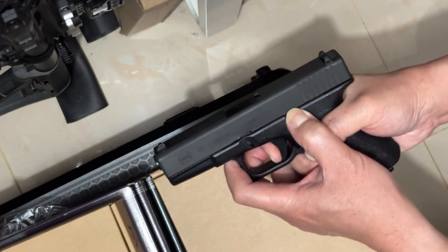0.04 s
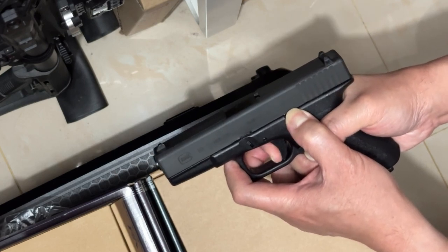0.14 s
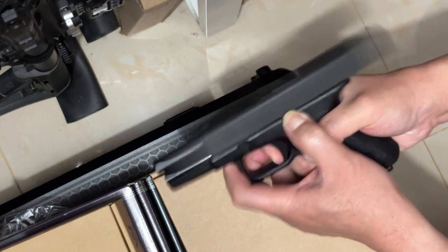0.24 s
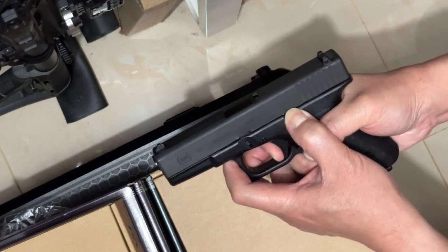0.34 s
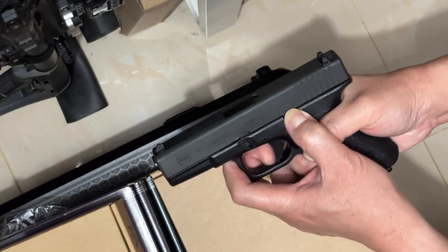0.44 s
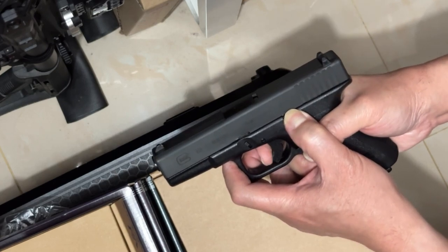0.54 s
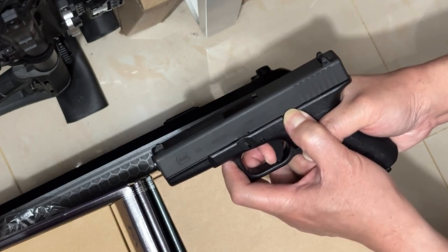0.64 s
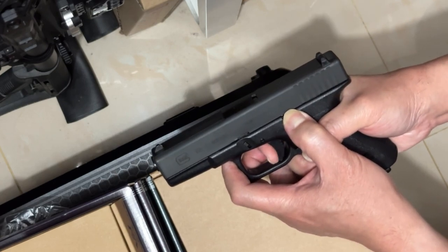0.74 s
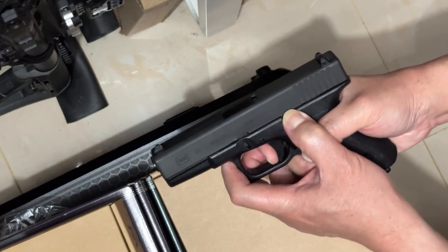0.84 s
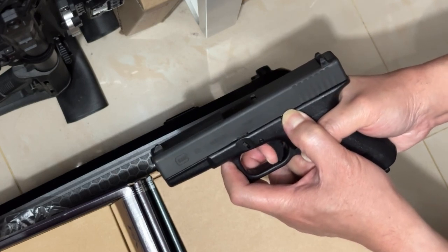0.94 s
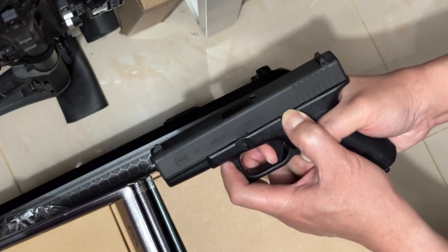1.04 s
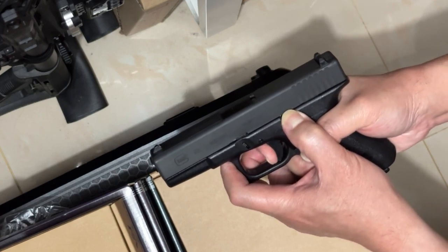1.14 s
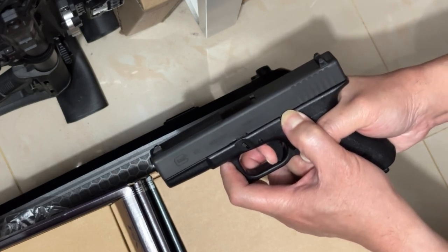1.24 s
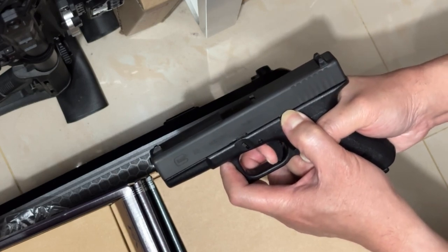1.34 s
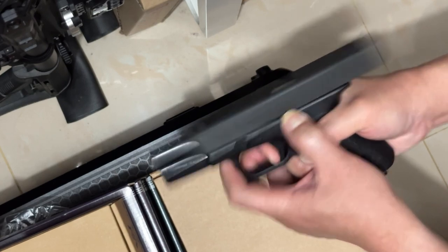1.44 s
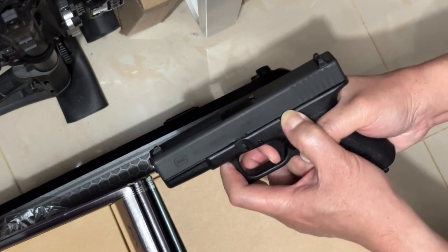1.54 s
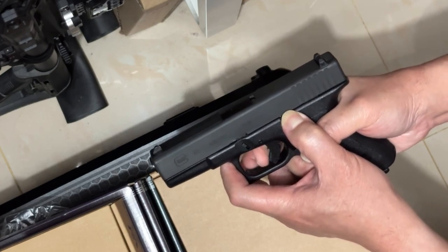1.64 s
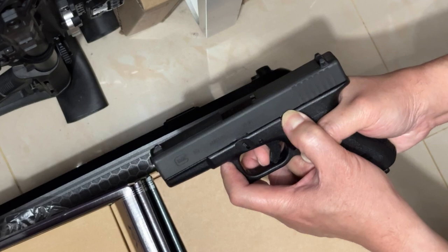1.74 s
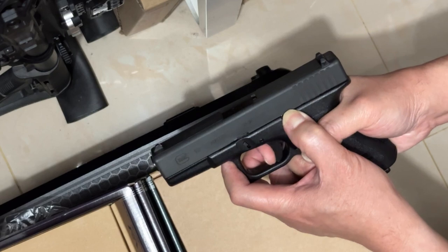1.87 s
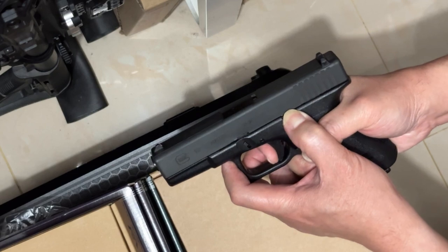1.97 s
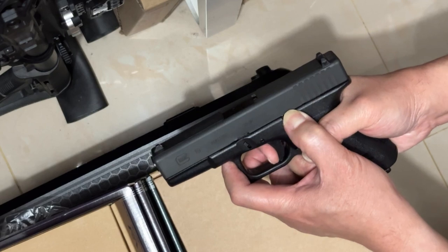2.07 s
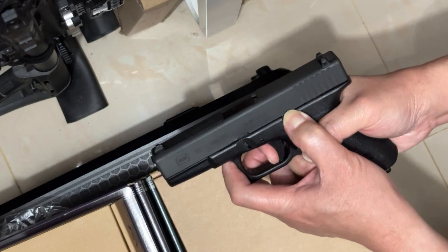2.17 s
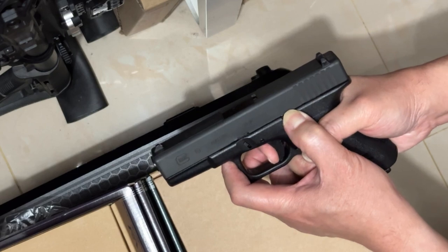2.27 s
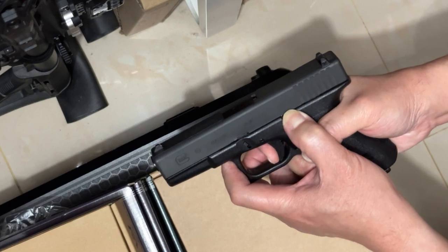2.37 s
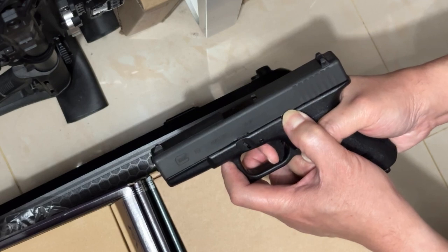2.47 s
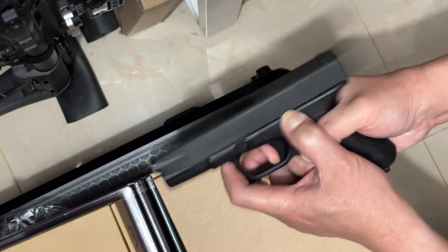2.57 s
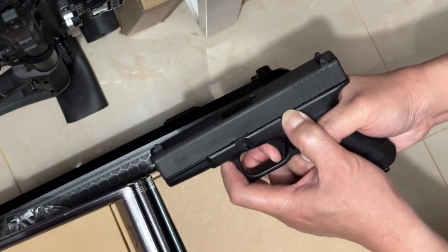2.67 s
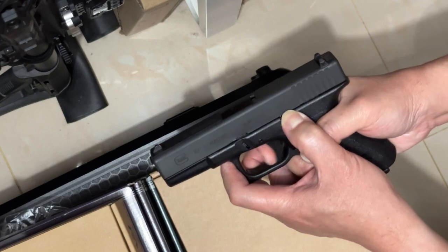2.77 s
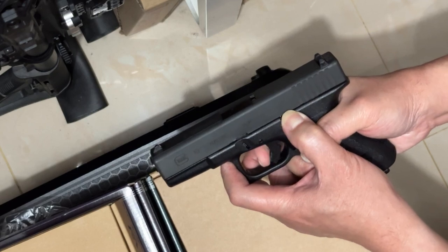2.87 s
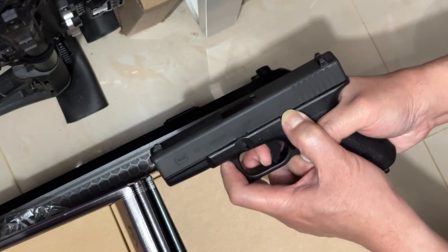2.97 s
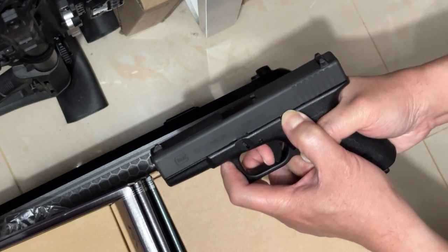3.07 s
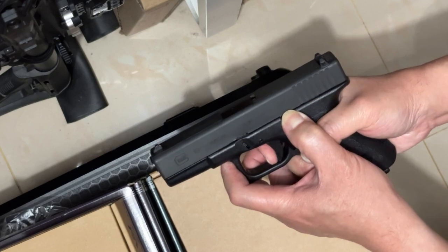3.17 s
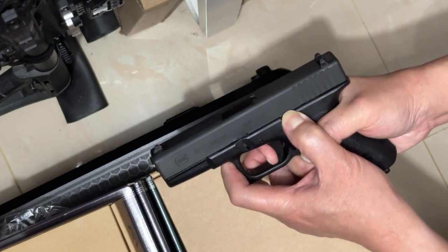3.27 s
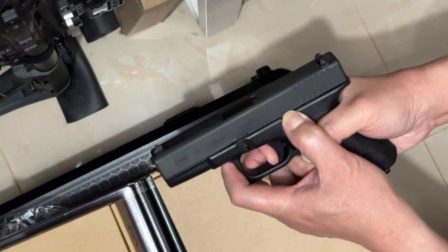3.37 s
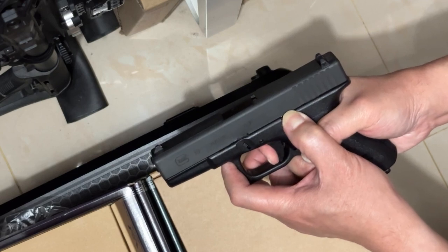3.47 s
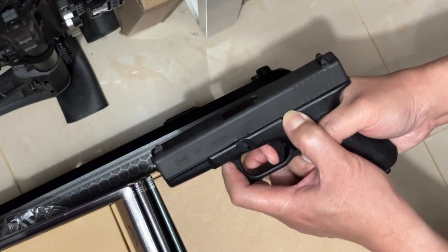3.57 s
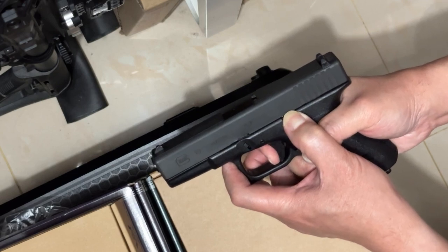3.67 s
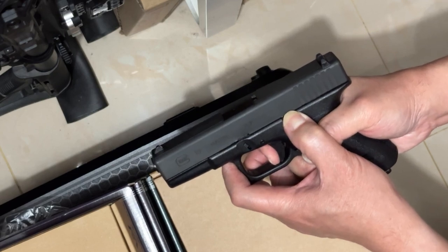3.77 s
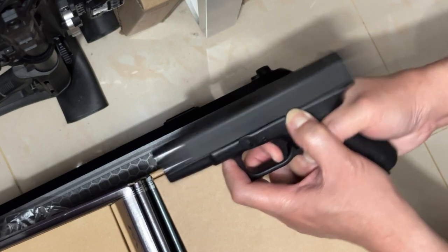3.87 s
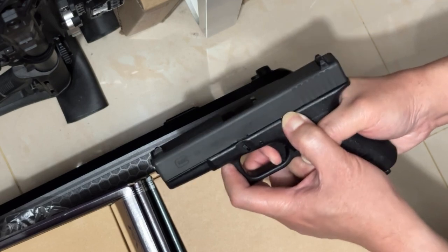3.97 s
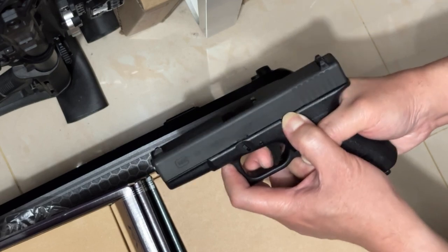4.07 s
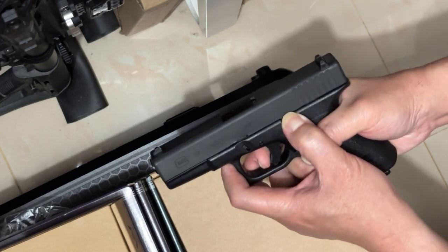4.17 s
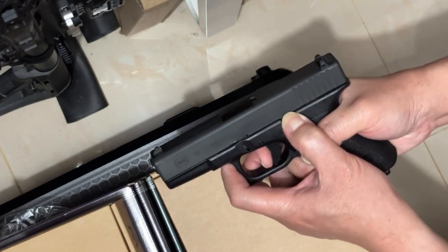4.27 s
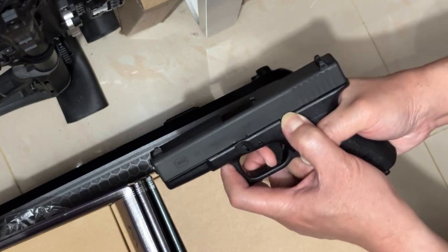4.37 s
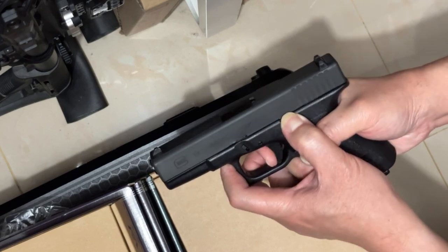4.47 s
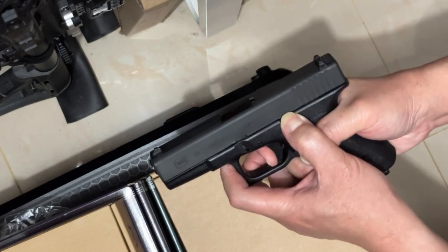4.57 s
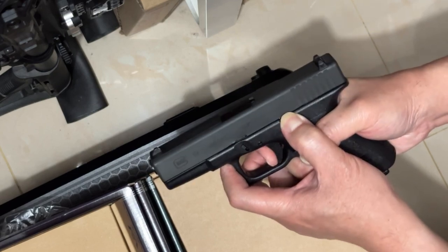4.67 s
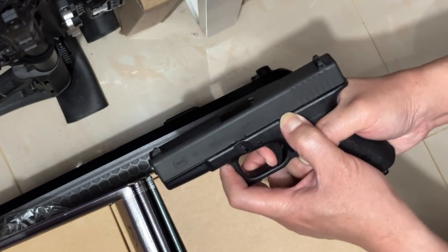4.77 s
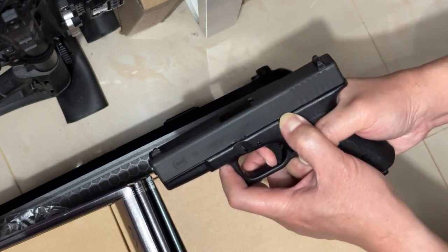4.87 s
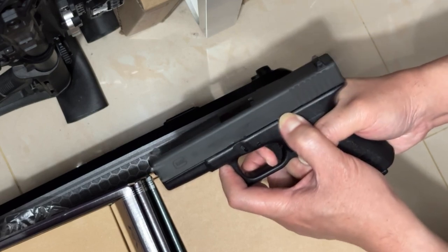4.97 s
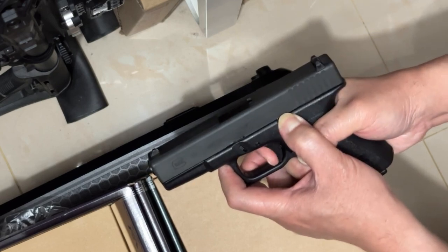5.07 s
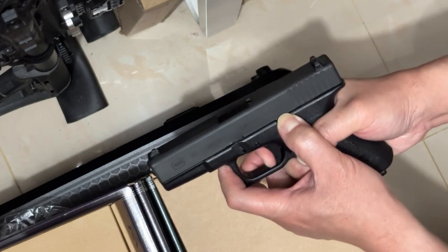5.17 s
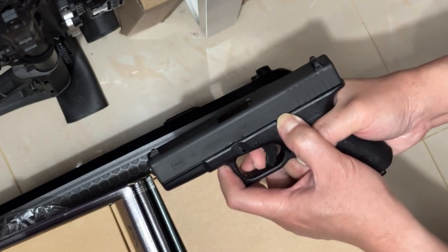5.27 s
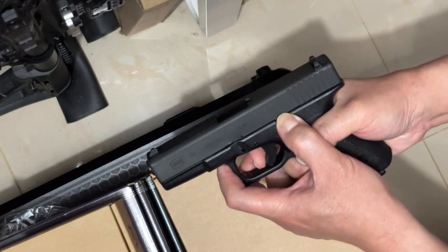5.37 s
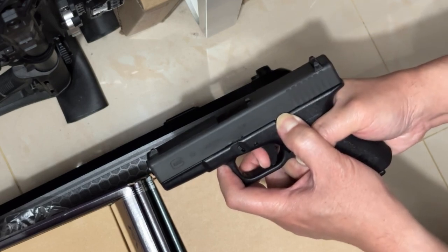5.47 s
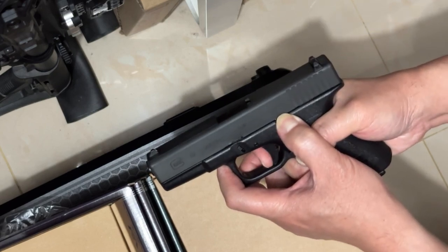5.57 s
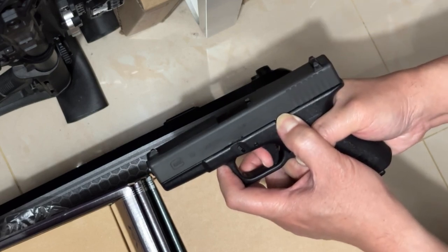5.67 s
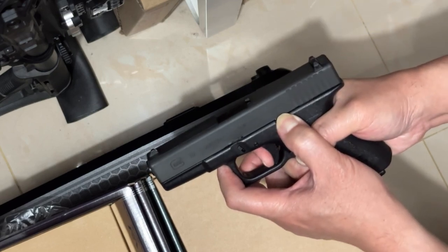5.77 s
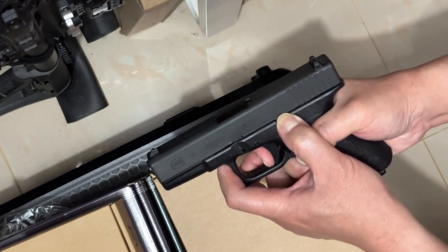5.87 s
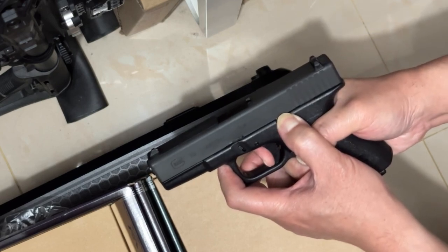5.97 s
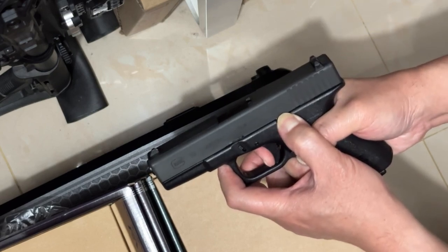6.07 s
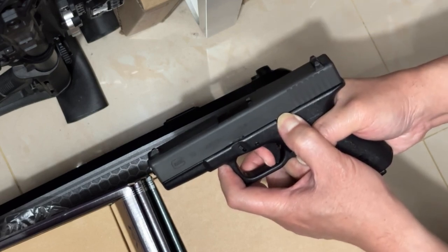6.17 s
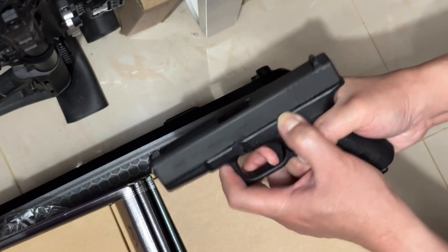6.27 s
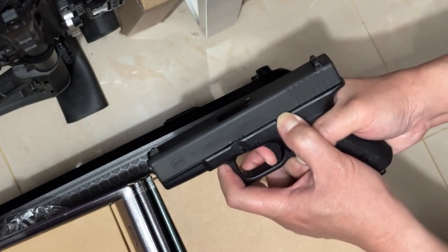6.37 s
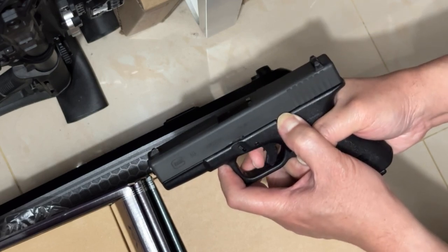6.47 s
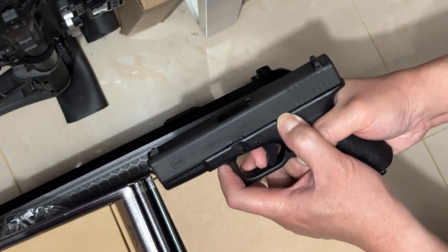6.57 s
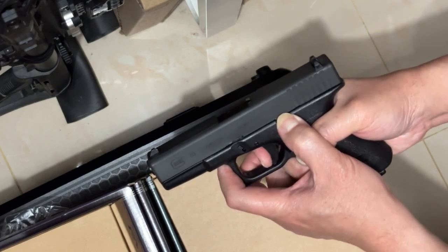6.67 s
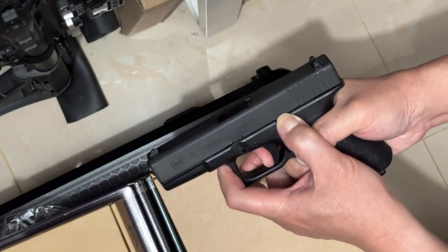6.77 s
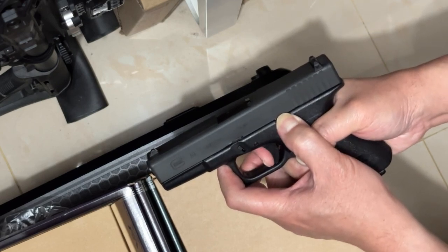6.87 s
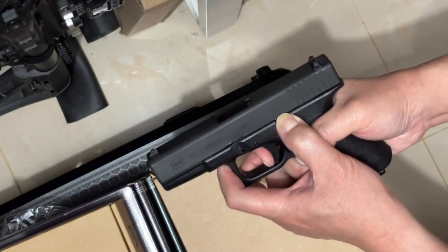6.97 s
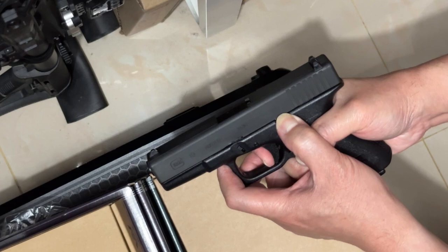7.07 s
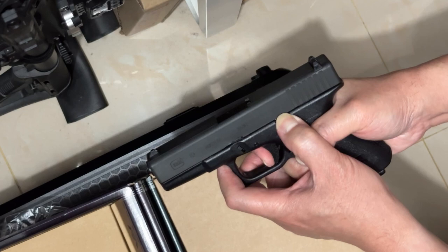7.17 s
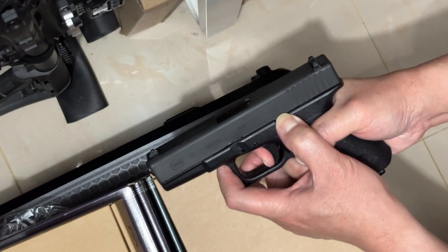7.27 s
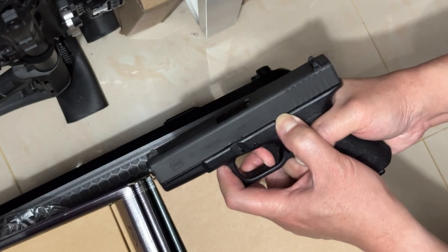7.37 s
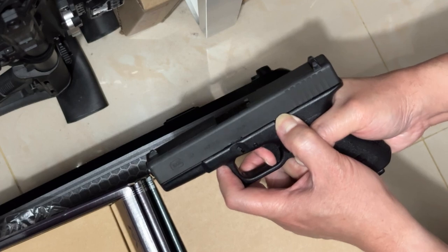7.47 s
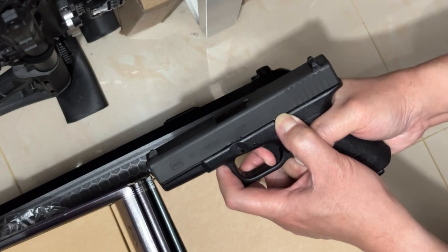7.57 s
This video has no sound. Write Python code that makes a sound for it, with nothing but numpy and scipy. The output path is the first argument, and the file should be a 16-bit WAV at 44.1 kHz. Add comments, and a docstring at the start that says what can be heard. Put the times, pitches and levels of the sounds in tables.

```python
"""A blowback gas pistol, fired empty seven times in a small tiled room, close to a phone's stereo mics.
On each shot the hammer swings onto the valve, gas bursts out and rings the steel, and the slide
rattles back and slams shut. Between shots the trigger is let go, the sear resets with a double
click, and the trigger is taken up again. The tiles answer with hard reflections and a short tail;
under it all lies a low room tone."""
import sys
import numpy as np
from scipy import signal
from scipy.fft import rfft, irfft
from scipy.io import wavfile
from scipy.ndimage import uniform_filter1d

SR = 44100
rng = np.random.default_rng(int(sys.argv[2]) if len(sys.argv) > 2 else 0)


def digitize_waveform(pressure):
    """Quantize a signal to 16-bit integers and store it at the path in sys.argv[1].

    Rows of a 2-D input are taken as channels; values are limited to [-1, 1].
    """
    field = np.atleast_2d(pressure).T
    bounded = np.clip(field, -1, 1)
    quanta = np.round(bounded * 32767).astype(np.int16)
    wavfile.write(sys.argv[1], SR, quanta)


N = 336042
RING_SIZE = 16384  # samples in one ring, burst or room tail
AGE = np.arange(RING_SIZE) / SR

# the shots: gas burst t/s, gas level/dB, hammer and slide force/dB
SHOTS = [(.2580, -19.5, 0), (1.4390, -15.5, -.5), (2.6002, -14, -1), (3.8582, -16, -.5), (5.0066, -15.5, 1),
         (6.2390, -16, 0), (7.4088, -17, .5)]
# the sear snaps back: t/s, rebound delay/s
SEAR_RESETS = [(.4492, 0.0098), (1.631, 0.0059), (2.8068, 0.011), (4.076, 0.012), (5.2322, .0148),
               (6.4378, 0.012)]
# the trigger is pulled against the sear: t/s, level/dB
TAKE_UPS = [(.6300, -43), (1.8490, -44), (3.0765, -40.5), (4.3033, -41.5), (5.477, -40), (6.6455, -45)]

# ringing modes: f/Hz, level/dB, t60/s
STEEL_MODES = [(5768, -12, .12), (6320, -10, .06), (6543, -9, .09), (6625, -7, .09), (6836, 0, .08),
               (7168, -3, .07), (7213, -2, .1), (7402, -9, .1), (7565, -5, .07), (7905, -7, .07)]  # small steel parts
FRAME_MODES = [(813, -13, .06), (1320, -3, .07), (1430, 0, .025), (1532, 0, .05), (1690, 0, .05),
               (2330, -8, .1), (2715, -6, .05), (3248, -6, .045), (3660, -2, .03), (4530, -5, .02)]  # slide and frame
GRIP_MODES = [(53.5, -7.5, 0.11), (100, -3, 0.095), (140, -3.5, 0.089), (204, -0.5, 0.13),
              (262.2, -0.5, 0.043), (595, -11, 0.058), (800, -6, .04)]  # the grip, dull in the hand
CAVITY_MODES = [(51, -20, .13), (113.4, -16, 0.071), (194, -9, 0.097), (252.9, -7.5, 0.059),
                (514, 0, 0.025), (614, -4.5, 0.03), (814, 1, .02)]  # air cavities thumped by the gas
WHISTLE_MODES = [(6850, 0, .014), (7170, -2, .012), (7580, -7, .009), (7900, -7, .009)]  # the gas port

# noise spectra: f/Hz, level/dB
ROOM_TONE_SPECTRUM = [(20, -11), (50, -0.5), (110, -0.5), (200, -4), (300, -7.5), (450, -15.5), (700, -22),
                      (1100, -26.5), (1900, -29.5), (3200, -24), (4500, -28), (6500, -36.5), (7800, -32.5),
                      (9500, -35), (16000, -44.5)]  # the quiet room
CLICK_SPECTRUM = [(300, -32.5), (600, -15.5), (1000, -6), (1300, 0.5), (1650, 0), (2000, -7), (3000, 0),
                  (4200, -7), (6500, -0.5), (8500, -2.5), (13000, -2.5), (16000, -10.5)]  # trigger linkage and sear
SCRAPE_SPECTRUM = [(300, -36.5), (600, -21), (900, -3), (1500, 3.5), (1900, -6.5), (2350, -0.5), (3700, 0),
                   (5000, -4.5), (6500, -6), (8000, -3.5), (12000, -9), (16000, -13.5)]  # trigger take-up, also the crack of the valve
HAMMER_SPECTRUM = [(100, -12), (300, -3.5), (800, -2), (1200, -3), (1680, 4), (2000, -5.5), (2800, 1),
                   (4500, -4), (7000, -1.5), (8500, -2.5), (13000, 1.5)]  # the hammer's swing
RAIL_SPECTRUM = [(100, -20), (400, -18), (750, -10.5), (1050, -12), (1600, 1), (2200, -3), (3200, -1),
                 (4300, -5.5), (6000, 3.5), (7100, 2), (8500, -3.5), (12000, -2)]  # the slide on its rails and at the rear stop
SHUT_SPECTRUM = [(100, -26), (600, -17.5), (1050, -12), (1300, 2), (1550, 4.5), (2000, -4.5), (3000, -3.5),
                 (3650, -1.5), (4100, -9), (4500, -1), (5200, -7.5), (7200, -9), (9000, -8)]  # the slide closing
GAS_SPECTRUM = [(300, -38.5), (1000, -19), (1600, -16), (2700, -13.5), (4200, -16.5), (5800, -16),
                (6450, -10), (6900, 0), (7300, -1.5), (8000, -9.5), (9000, -14), (12000, -15)]  # escaping gas

# reflections off nearby surfaces: delay/s, level/dB
REFLECTIONS = [(.0033, -12.5), (0.0129, -17), (0.017, -16.5)]
# treble response of the phone's mics: f/Hz, level/dB
MIC_RESPONSE = [(8000, 0), (8600, -4), (9100, -20.5), (9800, -31.5), (10500, -12), (13000, -8),
                (14300, -16.5), (15000, -27.5), (15700, -18), (16200, -31.5)]
# left mic port against the right: f/Hz, level/dB, phase/rad
PORT_BALANCE = [(60, 0, 0), (120, 0, 0), (220, -3, 0), (400, -5, 0), (700, -6, -.3), (1100, 0, -1.8),
                (1500, 0, .2), (2400, 0, 0), (3700, 0, -.6), (5000, 0, 0)]


def undb(db):
    """Decibels to gain."""
    return 10 ** (np.asarray(db) / 20)


def bin_gains(spectrum, size):
    """Gain of (f/Hz, level/dB) points at the bins of a transform."""
    hz, db = np.transpose(spectrum)
    bins = np.fft.rfftfreq(size, 1 / SR)
    return undb(np.interp(np.log(bins + 1), np.log(hz), db))


def colour(x, spectrum):
    """Minimum-phase filter with the given spectrum, so nothing sounds ahead of an attack."""
    size = 2 * x.shape[-1]
    cepstrum = irfft(np.log(bin_gains(spectrum, size)))
    cepstrum[1:size // 2] *= 2
    cepstrum[size // 2 + 1:] = 0
    return irfft(rfft(x, size) * np.exp(rfft(cepstrum)))[..., :size // 2]


def unit_energy(x):
    """Scale to the energy of a hundredth of a second at full level."""
    return x / np.sqrt(np.sum(x ** 2) / (SR / 100))


def add(track, t, db, sound):
    """Mix a sound into the track at t seconds with a gain of db."""
    start = int(t * SR)
    track[start:start + len(sound)] += undb(db) * sound[:N - start]


def ring(modes, spread_db):
    """Struck modes: decaying sines of alternating sign whose strengths vary from blow to blow."""
    out = np.zeros(RING_SIZE)
    for k, (hz, db, t60) in enumerate(modes):
        strength = (-1) ** k * undb(db + spread_db * rng.standard_normal())
        out += strength * np.sin(2 * np.pi * hz * AGE) * undb(-60 * AGE / t60)
    return unit_energy(out)


def burst(spectrum, rise_s, length_s, steep):
    """Noise of dense tiny contacts or gas that swells and dies; high steepness ends it abruptly."""
    noise = rng.choice([-1., 1.], RING_SIZE)
    envelope = (1 - np.exp(-AGE / rise_s)) * np.exp(-(AGE / length_s) ** steep)
    return unit_energy(colour(noise * envelope, spectrum))


def stereo(mid, side, side_db):
    """Mid and side to left and right."""
    return mid + undb(side_db) * side * np.array([[1], [-1]])


def room_tone(level_db=-61, waver_db=1):
    """The room all around the mics: a low rumble that wavers slightly under a steady faint hiss."""
    white = rng.standard_normal((2, N))
    mid, side = irfft(rfft(white) * bin_gains(ROOM_TONE_SPECTRUM, N), N)
    bed = stereo(mid, side, side_db=-11) / mid.std()
    drift = uniform_filter1d(uniform_filter1d(rng.standard_normal(N), size=3000), size=3000)
    waver = undb(waver_db * drift / drift.std())
    rumble = signal.sosfiltfilt(signal.butter(2, 500, fs=SR, output="sos"), bed)
    return undb(level_db) * (bed + rumble * (waver - 1))


def tiled_room(source, t60=.12, build_s=.0042, tail_db=-7):
    """Close up in a small room: direct sound, a few hard reflections and a short diffuse stereo tail."""
    envelope = (1 - np.exp(-(AGE / build_s) ** 2)) * undb(-60 * AGE / t60)
    mid, side = rng.standard_normal((2, RING_SIZE)) * envelope
    tail = stereo(mid, side, side_db=-10) / np.sqrt(np.sum(mid ** 2))
    tail_spectrum = [(100, -7), (400, -5), (900, -2.5), (1400, -5.5), (4000, -3), (7000, -1), (12000, 2.5)]
    response = undb(tail_db) * colour(tail, tail_spectrum)
    response[:, 0] += 1  # direct sound
    for delay, db in REFLECTIONS:
        response[:, int(delay * SR)] += undb(db)
    return undb(1) * signal.fftconvolve(source[None], response, axes=1)[:, :N]


def trigger(release_s=.1552):
    """Light clicks of the linkage between shots: release, sear reset with its rebound, take-up."""
    out = np.zeros(N)
    for t, _, _ in SHOTS[:-1]:
        tick = burst(CLICK_SPECTRUM, rise_s=.0002, length_s=.003, steep=1.3)
        add(out, t + release_s, -50, tick + undb(-12) * ring(FRAME_MODES, spread_db=2))
    for t, rebound_s in SEAR_RESETS:
        for delay, db, steel_db in [(0, -43.7, -16), (rebound_s, -44.5, -15.5)]:
            snap = burst(CLICK_SPECTRUM, rise_s=.0003, length_s=.0033, steep=1.2)
            add(out, t + delay, db, snap + undb(steel_db) * ring(STEEL_MODES, spread_db=1.7))
    for t, db in TAKE_UPS:
        scrape = burst(SCRAPE_SPECTRUM, rise_s=.0018, length_s=.0068, steep=1.2)
        add(out, t, db, scrape + undb(-12) * ring(FRAME_MODES, spread_db=1))
    return out


def hammer(lead_s=.0135, level_db=-24.5):
    """Just ahead of the gas, the sear slips and the hammer swings until it meets the valve."""
    out = np.zeros(N)
    for t, _, force_db in SHOTS:
        swing = burst(HAMMER_SPECTRUM, rise_s=.003, length_s=.0118, steep=3.5)
        add(out, t - lead_s, level_db + force_db, swing)
    return out


def slide(jitter_s=.0009):
    """The slide is blown back and its spring drives it home."""
    out = np.zeros(N)
    for t, _, force_db in SHOTS:
        vent_late, stop_late = jitter_s * rng.standard_normal(2)
        # it scrapes along its rails, jolts the grip, vents the spent gas and knocks on the rear stop
        scrape = burst(RAIL_SPECTRUM, rise_s=.003, length_s=.032, steep=1.4)
        add(out, t + .006, force_db - 17, scrape)
        add(out, t + .014, force_db - 30.5, ring(GRIP_MODES, spread_db=2.4))
        vent = burst(GAS_SPECTRUM, rise_s=.00041, length_s=.0018, steep=3.1)
        add(out, t + .018 + vent_late, force_db - 25, vent)
        knock = burst(RAIL_SPECTRUM, rise_s=.0002, length_s=.003, steep=2.1)
        knock += undb(-9) * ring(FRAME_MODES, spread_db=1.8)
        add(out, t + .0235 + stop_late, force_db - 24, knock)
        # on the way home it picks up the barrel, then slams against the frame
        pickup = burst(SHUT_SPECTRUM, rise_s=.004, length_s=.008, steep=2.5)
        add(out, t + .0337, force_db - 24, pickup)
        slam = burst(SHUT_SPECTRUM, rise_s=.001, length_s=.0052, steep=1.3)
        slam += undb(-11) * ring(FRAME_MODES, spread_db=2)
        add(out, t + .0407, force_db - 18, slam)
    return out


def gas_burst(floor_echo_s=.0033, floor_echo_db=-2.5):
    """The valve cracks open: a whistling puff of gas and its quick echo off the floor."""
    out = np.zeros(N)
    for t, gas_db, _ in SHOTS:
        crack = burst(SCRAPE_SPECTRUM, rise_s=.0001, length_s=.00079, steep=2)
        add(out, t, gas_db - 9.5, crack)
        for delay, path_db in [(0, 0), (floor_echo_s, floor_echo_db)]:
            puff = burst(GAS_SPECTRUM, rise_s=.0004, length_s=.0026, steep=8.1)
            whistle = undb(-4) * ring(WHISTLE_MODES, spread_db=1.5)
            add(out, t + delay, gas_db + path_db, puff + whistle)
        # the gas rings the steel and thumps the cavities
        add(out, t, gas_db - 10, ring(STEEL_MODES, spread_db=1.5))
        add(out, t + .0008, gas_db - 9, ring(CAVITY_MODES, spread_db=2.7))
    return out


def scene():
    """The pistol at close range in the tiled room, over the room tone, at the two mic ports."""
    pistol = tiled_room(hammer() + gas_burst() + slide() + trigger())
    # the lower mids reach the right port louder and earlier; each side takes half the imbalance
    hz, db, phase = np.transpose(PORT_BALANCE)
    bins = np.fft.rfftfreq(N, 1 / SR)
    half = np.sqrt(undb(np.interp(bins, hz, db))) * np.exp(.5j * np.interp(bins, hz, phase))
    at_ports = irfft(rfft(pistol) * np.array([half, 1 / half]), N)
    low_cut = signal.butter(2, 27, "high", fs=SR, output="sos")
    return signal.sosfilt(low_cut, at_ports + room_tone())


def record(dry, split_hz=9000, port_lag_s=.00017, top_hz=16400):
    """The phone dulls the top octave, where its ports fall out of phase, rounds peaks and cuts the top."""
    left, right = colour(dry, MIC_RESPONSE)
    hz = np.fft.rfftfreq(N, 1 / SR)
    phase_lag = 2 * np.pi * port_lag_s * np.maximum(hz - split_hz, 0)
    right = irfft(rfft(right) * np.exp(-1j * phase_lag), N)
    pair = np.array([left, right])
    rounded = pair / (1 + pair ** 8) ** (1 / 8)
    high_cut = signal.ellip(8, .05, 70, top_hz, fs=SR, output="sos")
    return signal.sosfiltfilt(high_cut, rounded)


dry = scene()
out = record(dry)
digitize_waveform(out)
```